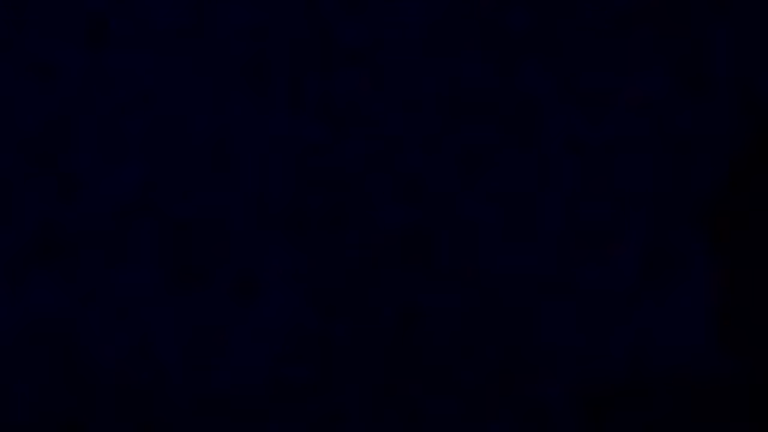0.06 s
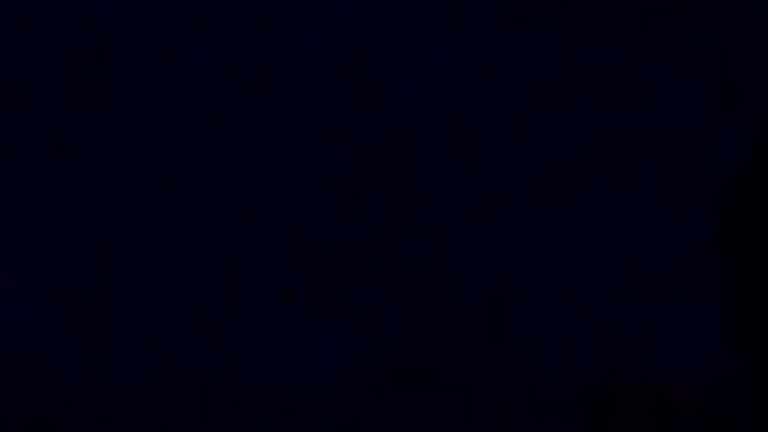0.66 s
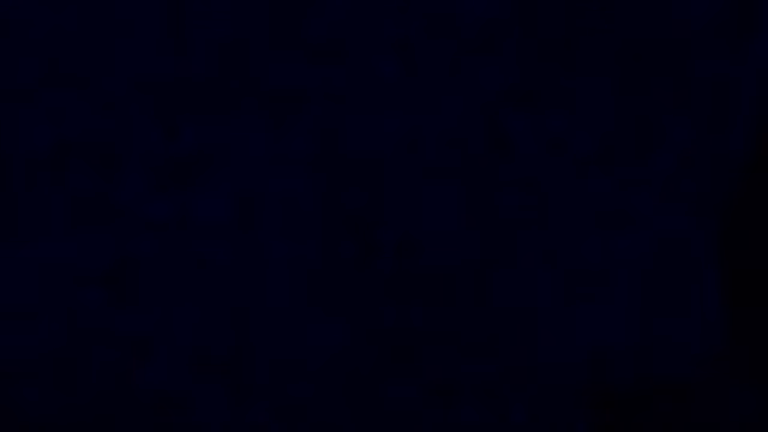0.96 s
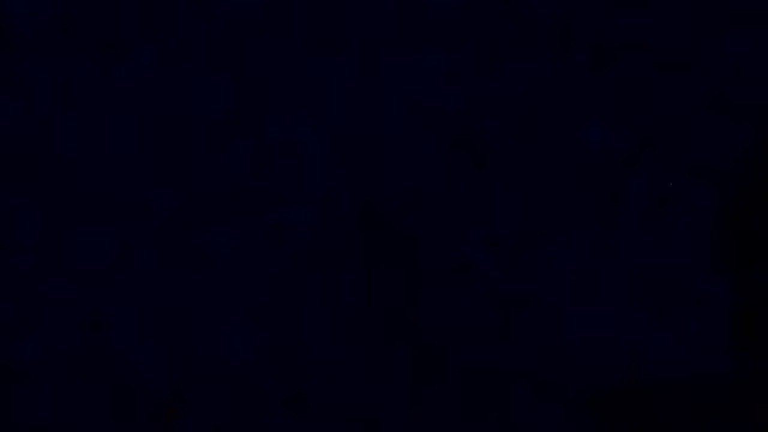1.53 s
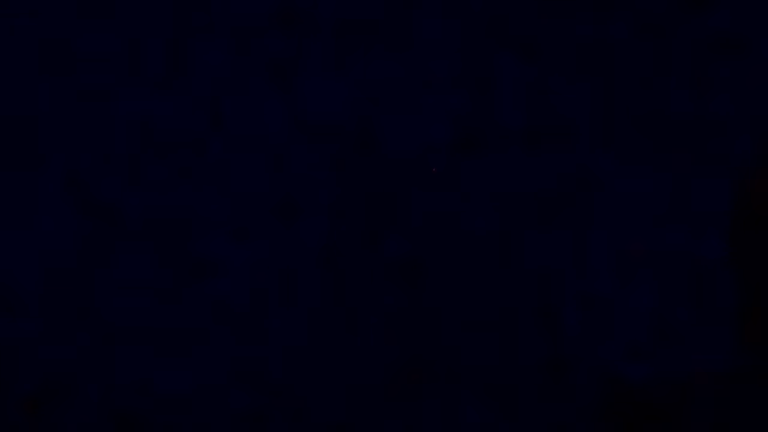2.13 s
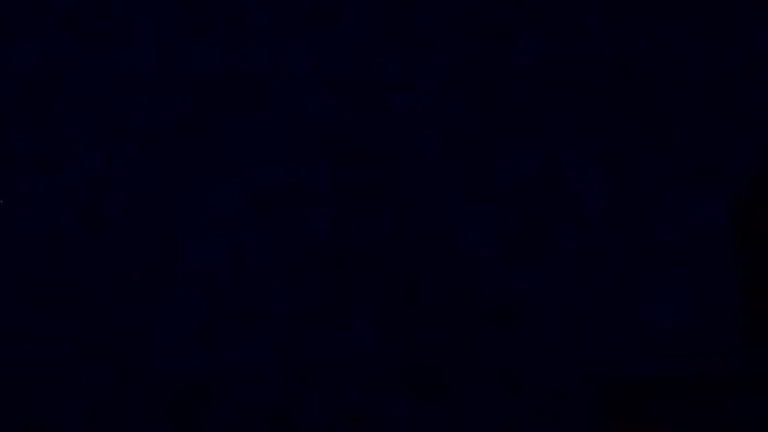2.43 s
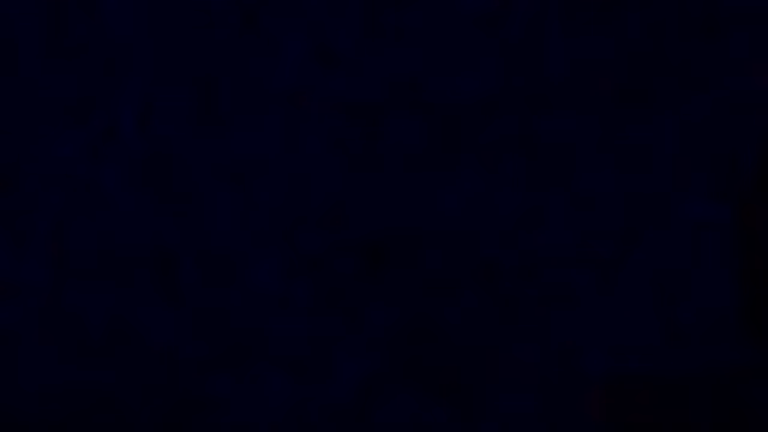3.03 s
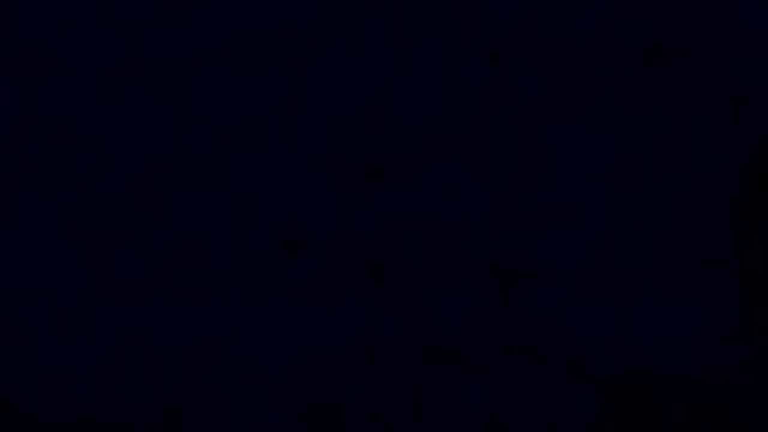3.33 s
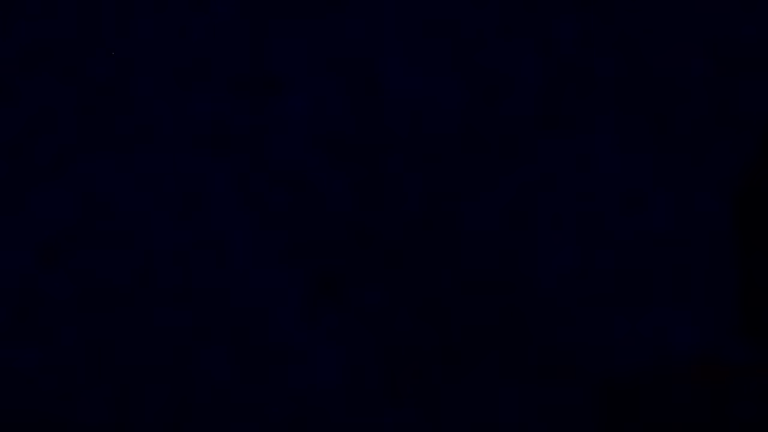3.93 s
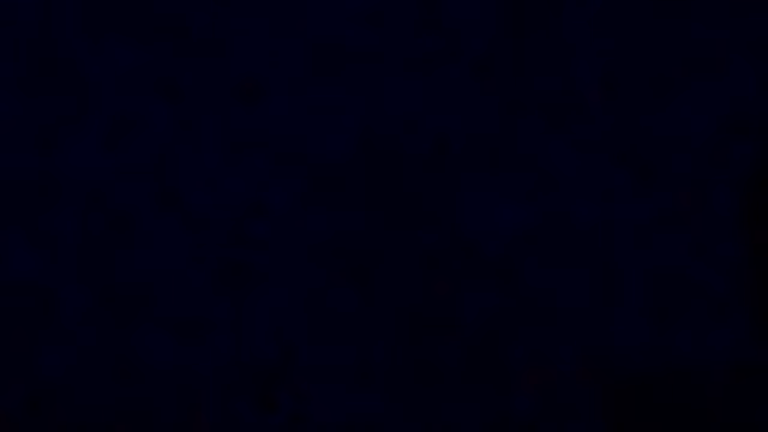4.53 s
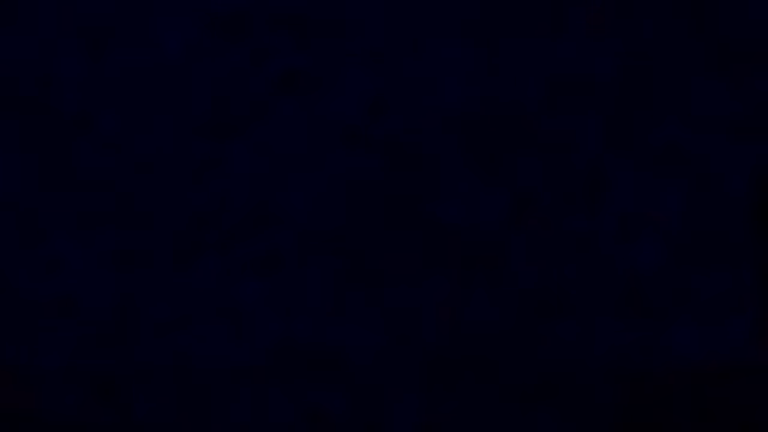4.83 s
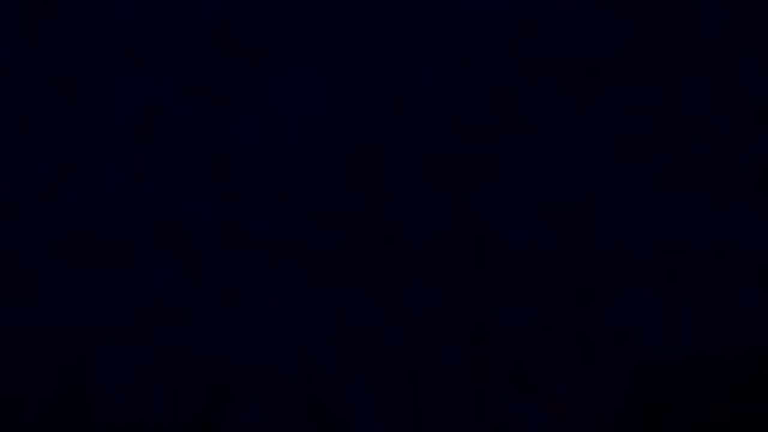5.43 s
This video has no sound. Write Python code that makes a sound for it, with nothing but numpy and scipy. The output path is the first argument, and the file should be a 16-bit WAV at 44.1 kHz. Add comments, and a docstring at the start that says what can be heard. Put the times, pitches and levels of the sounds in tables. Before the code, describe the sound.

A hand-held microphone rumbles low and unevenly for the whole stretch of nearly six seconds, outdoors among trees at night. Fingers rub it, and soft bumps land around 0.8, 2, 2.5, 3.5 and 5.3 seconds. A fairly near bird, just right of centre, calls at about 1.3, 2.5 and 4.6 seconds. Each call lasts about a third of a second: a clear whistle slides up, cracks and drops to a lower note, leaving a short echo. The second is quicker and more warbling. Far behind are a thin hiss, a steady motor hum, a very faint high cricket chirping evenly on the left, and scattered distant bird whistles. Faint falling swishes pass near the start and three times between 3.3 and 4.4 seconds. A few small dry ticks sound on the left at 4.6 seconds. From 5 seconds a slight scuff and a soft, close rustle grow to the end.

```python
"""A hand-held microphone rumbles and rubs in the night air; a cricket chirps and a distant motor hums.
Faint swishes slide down, the housing takes soft bumps, and birds whistle far off among the trees.
A nearer bird calls three times with the two voices of its syrinx: a whistle slides up, cracks, and drops
to a lower, wavering note. A few dry ticks sound under the last call; a soft rustle grows at the end."""
import sys
import numpy as np
from scipy import signal
from scipy.fft import rfft, irfft
from scipy.io import wavfile

SR = 44100
rng = np.random.default_rng(int(sys.argv[2]) if len(sys.argv) > 2 else 0)


def to_wav(s):
    """Save 16-bit WAV."""
    ch = np.atleast_2d(s).T  # columns
    pcm = np.round(np.clip(ch, -1, 1) * 32767)  # PCM
    wavfile.write(sys.argv[1], SR, pcm.astype(np.int16))


N = 250047
TIME = np.arange(N) / SR


def from_db(db):
    """Decibels to gain."""
    return 10 ** (np.asarray(db) / 20)


def unit_rms(x):
    """Scale to unit power."""
    return x / np.sqrt(np.mean(x ** 2) + 1e-20)


def in_time(points):
    """Read a curve sample by sample."""
    return np.interp(TIME, *np.transpose(points))


def at_hz(points, hz):
    """Read a spectrum on a log-frequency axis."""
    knots, values = np.transpose(points)
    return np.interp(np.log(hz + 1e-3), np.log(knots), values)


def during(start, end):
    """The samples between two moments."""
    return slice(*np.searchsorted(TIME, [start, end]))


def ramp(age, length):
    """From 0 to 1 over a given length."""
    return np.clip(age / length, 0, 1)


def bell(age, width):
    """A smooth hump of height 1."""
    return np.exp(-(age / width) ** 2)


def arch(start, length):
    """A rounded swell, silent outside its span."""
    inside, swell = during(start, start + length), np.zeros(N)
    swell[inside] = np.sqrt(np.abs(np.sin(np.pi * (TIME[inside] - start) / length)))
    return swell


def drift(rate_hz):
    """A random wander of rms 1."""
    knots = np.arange(0, TIME[-1] + 1, .5 / rate_hz)
    return unit_rms(np.interp(TIME, knots, rng.standard_normal(len(knots))))


def band(x, low_hz, high_hz):
    """Gentle band-pass."""
    return signal.sosfilt(signal.butter(2, [low_hz, high_hz], "band", fs=SR, output="sos"), x + 1e-18)


def phase_of(hz):
    """Running phase of a moving pitch."""
    return 2 * np.pi * np.cumsum(hz) / SR


def glides(rows):
    """Tones that swell and fade as they slide from one pitch to another."""
    tones = np.zeros(N)
    for start, length, from_hz, to_hz, db in rows:
        hz = np.interp(TIME, [start, start + length], [from_hz, to_hz])
        tones += from_db(db) * arch(start, length) * np.sin(phase_of(hz))
    return tones


def place(x, left_db, lag_ms=0.):
    """Place a source: the left side is left_db louder than the right and lag_ms later."""
    left = np.interp(TIME - lag_ms / 1000, TIME, x)
    return np.array([left, x]) * from_db([[left_db / 2], [-left_db / 2]])


def trees(x, t60, gap_s):
    """Scatter from trunks and leaves: dense echoes that build up and die away."""
    age = TIME[:SR]
    echoes = rng.standard_normal(SR) + 0.31 * rng.standard_normal((2, SR))
    echoes = echoes * from_db(-60 * age / t60) * (1 - bell(age, gap_s))
    return signal.fftconvolve(x[None], unit_rms(echoes) / np.sqrt(SR), axes=1)[:, :N]


# How alike the microphone's two ports hear: (frequency [Hz], likeness [ratio, capped at 1])
PORT_LIKENESS = [(25, 0.67), (55, 1.1), (110, 1.3), (200, 0.96), (400, 0.84), (1000, 0.53), (3000, 0.4),
                 (6000, 0.58), (12000, 0.2)]
# Lean between the ports: (frequency [Hz], left minus right [dB])
PORT_BALANCE = [(30, -3.5), (100, 0.5), (350, -1), (1200, 2.5), (2800, 4.5), (5000, -0.1), (12000, 6.5)]
def stereo_noise(spectrum):
    """Coloured noise of rms 1, alike at both ports in the bass and less so in the treble."""
    hz = np.arange(N // 2 + 1) * SR / N
    mid, side = rfft(rng.standard_normal((2, N))) * from_db(at_hz(spectrum, hz))
    alike = np.clip(at_hz(PORT_LIKENESS, hz), 0, 1)
    signs = np.array([[1], [-1]])
    ports = np.sqrt(1 + alike) * mid + signs * np.sqrt(1 - alike) * side
    return unit_rms(irfft(ports * from_db(signs * at_hz(PORT_BALANCE, hz) / 2), N))


# Rumble of the hand that holds the microphone: (time [s], level [dB])
HAND_SHAKE = [(0, -39.5), (.2, -41.5), (.29, -33.5), (.42, -37), (.55, -34.5), (.66, -36.5), (.75, -41),
              (.93, -39), (1.3, -40), (1.5, -46), (1.8, -37), (2.0, -43), (2.5, -39), (2.8, -43),
              (3.6, -39.5), (4.4, -38.5), (5.3, -43), (5.67, -38)]
# Fingers on the housing: (start [s], length [s], level [dB], speed [ratio])
FINGER_RUBS = [(0.016, 0.24, -37, 0.94), (0.448, 0.21, -37, 0.89), (0.727, 0.36, -40.5, 1.056),
               (1.12, 0.21, -45.5, 0.97), (1.842, 0.14, -38.5, 1.003), (1.99, .19, -39.5, 1.03),
               (2.247, 0.14, -45, 1.01), (2.461, 0.082, -33, 0.95), (2.707, .1, -42, 1.02),
               (3.109, 0.067, -40.5, 0.9), (3.419, 0.25, -43.5, .95), (3.61, 0.2, -37.5, .88),
               (4.225, 0.19, -47.5, 0.91), (5.324, 0.22, -41, 1.02), (5.604, 0.068, -34, 0.863)]
# Colours of the rumble and the rubbing: (frequency [Hz], relative density [dB])
RUMBLE_COLOUR = [(8.8, -20), (15, 6), (27, -3), (43, -2.5), (130, -10), (170, -48), (290, -120)]
RUB_COLOUR = [(30, -34), (60, -13), (100, 0.5), (140, 3), (190, -1.5), (250, -14), (350, -25.5), (600, -45),
              (2000, -101)]
def handling(resting_grip_db=-48.5, lumpy_db=1.17):
    """The grip shakes the housing and the fingers rub it; a faster rub sounds higher."""
    rubs, speed = np.zeros(N), np.ones(N)
    for start, length, db, rub_speed in FINGER_RUBS:
        rubs += from_db(db) * arch(start, length)
        speed[during(start, start + length)] += rub_speed - 1
    travel = np.cumsum(speed) / SR % TIME[-1]
    friction = np.array([np.interp(travel, TIME, port) for port in stereo_noise(RUB_COLOUR)])
    rub_gain = np.hypot(from_db(resting_grip_db), rubs) * from_db(lumpy_db * drift(18))
    rumble = from_db(in_time(HAND_SHAKE)) * stereo_noise(RUMBLE_COLOUR)
    return rumble + rub_gain * friction


# Haze of the farthest birds, and a rustle close by: (time [s], level [dB])
CHORUS_LEVEL = [(0, -66), (.55, -80), (.85, -70.5), (1.6, -64.5), (2.1, -70), (2.9, -68), (4.2, -69),
                (5.67, -71)]
RUSTLE_LEVEL = [(0, -84), (3.3, -70.5), (4.5, -63.5), (4.95, -66), (5.12, -61), (5.32, -57), (5.47, -58.5),
                (5.67, -52.5)]
# Colours of the far hiss, the haze and the rustle: (frequency [Hz], relative density [dB])
AIR_COLOUR = [(120, -21), (250, -5.5), (330, -9), (500, -15), (850, -22.5), (1100, -17), (1700, -23),
              (2500, -27), (3300, -34), (4100, -37), (5800, -34), (7200, -31), (8200, -45.5),
              (10200, -46.5), (11000, -52), (12200, -47), (13500, -62)]
HAZE_COLOUR = [(1200, -39), (1800, -2), (2400, -1), (2900, -3), (3400, -5.5), (4200, -28.5), (8000, -60)]
RUSTLE_COLOUR = [(200, 11.5), (450, -4.5), (1000, 0.5), (1700, 1.5), (3000, -4.5), (4500, -4.5),
                 (7000, -12.5), (9000, -24.5), (12000, -20.5), (14000, -24)]
def night_air(hiss_db=-56.5):
    """Steady far hiss, the haze of the farthest birds, and a soft grainy rustle that grows close by."""
    hiss = from_db(hiss_db + 0.66 * drift(6)) * stereo_noise(AIR_COLOUR)
    haze = from_db(in_time(CHORUS_LEVEL) + 2.0 * drift(11)) * stereo_noise(HAZE_COLOUR)
    rustle = from_db(in_time(RUSTLE_LEVEL) + 1.44 * drift(60)) * stereo_noise(RUSTLE_COLOUR)
    return hiss + haze + rustle


# A motor in the distance, centred: (order [multiple of the turning rate], base level [dB])
MOTOR_ORDERS = [(17, -70), (18, -79), (19, -79), (20, -79.5), (21, -80.5), (22, -77.5), (23, -84),
                (24, -82)]
# How well it carries to the microphone: (time [s], gain [dB])
MOTOR_CARRY = [(0, 1), (1.5, 3), (2.5, -1.5), (4.7, 1.5), (5.67, -4.5)]
def motor(turn_hz=59.12, waver_db=2.0):
    """High orders of a far motor, wavering a little on the air."""
    turn = phase_of(turn_hz * (1 + 0.000954 * drift(4)))
    hum = np.zeros(N)
    for order, db in MOTOR_ORDERS:
        phase = order * turn + 0.48 * drift(6) + rng.uniform(0, 2 * np.pi)
        hum += from_db(db + waver_db * drift(4)) * np.sin(phase)
    return place(np.sqrt(2) * from_db(in_time(MOTOR_CARRY)) * hum, left_db=0)


def cricket(pitch_hz=7190, first_s=0.038, every_s=.3615, length_s=0.13, stroke_hz=22, base_db=-72.5):
    """Off to the left, chirps at a steady beat: each is a few wing strokes on one high resonance."""
    chirps = np.zeros(N)
    for beat, (late, strong) in enumerate(rng.standard_normal((16, 2))):
        start = first_s + beat * every_s + 0.01 * late
        strokes = 1 - 0.48 * np.cos(2 * np.pi * stroke_hz * (TIME - start))
        chirps += from_db(base_db + 0.5 * strong) * arch(start, length_s) * strokes
    song = chirps * np.sin(phase_of(pitch_hz + 55 * drift(200)))
    return place(song, left_db=8.5) + from_db(1.5) * trees(song, t60=0.63, gap_s=0.011)


# Faint swishes in the background: (start [s], length [s], from [Hz], to [Hz], level [dB])
FALLING_SWISHES = [(0.17, 0.3, 5510, 3570, -71), (3.337, 0.21, 5216, 2300, -69),
                   (3.75, .2, 5410, 2190, -64.5), (4.158, .19, 5300, 2200, -65.5)]
def swishes(width_hz=900):
    """A soft, broad hiss slides downwards."""
    hiss = drift(width_hz) + .5 * np.array([drift(width_hz), drift(width_hz)])
    return glides(FALLING_SWISHES) * hiss


# Knocks right on the microphone housing: (time [s], relative level [dB])
HOUSING_KNOCKS = [(0.531, -26), (0.629, -26), (0.836, -16), (1.952, -21), (2.034, -18.5), (2.49, -19),
                  (2.916, -28), (3.433, -22.5), (3.626, -23), (5.322, -19.5), (5.622, -28)]
def bumps(gain_db=1.0, ring_hz=148, t60=.035, contact_s=.0029):
    """Soft knocks set the housing ringing for a few cycles."""
    knocks, age = np.zeros(N), TIME[:SR // 8]
    for time, db in HOUSING_KNOCKS:
        knocks[round(time * SR)] = from_db(db + gain_db)
    ring = -from_db(-60 * age / t60) * np.sin(2 * np.pi * ring_hz * age)
    thud = ring * (1 - bell(age, contact_s))
    return signal.fftconvolve(knocks, thud)[:N]


# Birds far off in the wood: (start [s], length [s], from [Hz], to [Hz], level [dB])
FAR_WHISTLES = [(0.661, 0.18, 3230, 2340, -73.5), (1.005, 0.066, 2000, 3592, -81),
                (1.13, 0.03, 3120, 2950, -66), (1.821, 0.085, 1800, 2910, -66),
                (1.869, 0.037, 3870, 3600, -69), (1.928, 0.15, 3220, 2200, -70),
                (2.98, .17, 2244, 3445, -74), (3.42, 0.098, 2620, 1997, -69), (3.52, 0.14, 2490, 3510, -77),
                (3.855, 0.073, 1910, 3010, -66)]
def far_birds():
    """Distant whistles reach the microphone only as scatter."""
    return trees(np.sqrt(2) * glides(FAR_WHISTLES), t60=0.22, gap_s=0.0022)


CRACK_S, PUSH_S = .011, 0.013   # the upward flick; half-width of each voice's one push of air
# The bird's throat favours the middle of its range: (frequency [Hz], gain [dB])
THROAT_GAIN = [(1600, -16), (1900, -7.5), (2150, -7), (2450, -2.5), (2700, 0.5), (3200, -6.5), (3900, -3)]
# The nearer bird's calls, levels before throat and accents: (crack time [s], rise [s], fall [s],
# high voice [Hz], crack top [Hz], squeak [Hz], low voice [Hz], droop [Hz], warble depth [Hz],
# rise level [dB], squeak level [dB], fall level [dB], push place [share of the rise], push [dB])
NEAR_CALLS = [(1.444, 0.19, .174, 2519, 3260, 3172, 1910, 150, 30.1, -51.5, -60, -50, 0.92, 7.5),
              (2.574, .092, .2, 2784, 3890, 3353, 2115, 359, 750, -50, -45.5, -45.5, 0.72, 5),
              (4.705, .167, .174, 2550, 3253, 3144, 1939, 220.2, 65, -49, -64, -47, .78, 2)]
def high_voice(start_flat=.38, settle_share=.38, swell_db=3, crack_db=6.5, release_s=.004):
    """Pitch and gain of a whistle that slides up, swells, flicks at the crack and leaves a squeak."""
    pitch, gain = np.zeros((2, N))
    unsteady = 1 + 0.0121 * drift(200)
    for call in NEAR_CALLS:
        crack, rise_s, _, high_hz, top_hz, squeak_hz = call[:6]
        rise_db, squeak_db, _, push_place, push_db = call[9:]
        squeak_start = crack + .02
        rise, squeak = during(crack - rise_s, squeak_start), during(squeak_start, crack + rise_s)
        age = TIME[rise] - crack   # negative before the crack
        along = ramp(age + rise_s, rise_s)
        slide_hz = high_hz * (1 - start_flat * np.exp(-along / settle_share))
        pitch[rise] = slide_hz + (top_hz - slide_hz) * ramp(age, CRACK_S) ** 2
        level_db = rise_db + at_hz(THROAT_GAIN, pitch[rise]) + swell_db * (along - 1)
        level_db += crack_db * bell(age - CRACK_S / 2, CRACK_S)
        level_db += push_db * bell(age + rise_s * (1 - push_place), PUSH_S)
        attack, release = ramp(along, 0.23), ramp(CRACK_S + release_s / 2 - age, release_s)
        gain[rise] = from_db(level_db) * attack * release
        pitch[squeak] = squeak_hz * unsteady[squeak]
        gain += from_db(squeak_db) * arch(squeak_start, 0.19 * rise_s)
    return pitch, gain


def low_voice(crest_share=.4, push_share=0.59, warble_hz=29.06, attack_s=.016, release_s=0.019):
    """Pitch and gain of the lower note after the crack: it arches over and droops, warbling at first."""
    pitch, gain = np.zeros((2, N))
    for crack, _, fall_s, _, _, _, low_hz, droop_hz, depth_hz, _, _, fall_db, _, push_db in NEAR_CALLS:
        start = crack + CRACK_S
        fall = during(start, start + fall_s)
        age = TIME[fall] - start
        along = age / fall_s
        flicks = np.abs(np.cos(np.pi * warble_hz * age)) ** 7   # pointed, upward
        warble = flicks * (1 - ramp(along, .75) ** 3)   # gone three quarters of the way through
        droop = ((along - crest_share) / (1 - crest_share)) ** 2
        pitch[fall] = low_hz - droop_hz * droop + depth_hz * warble
        push = bell(age - push_share * fall_s, PUSH_S)
        level_db = fall_db + at_hz(THROAT_GAIN, pitch[fall]) + push_db * push
        gain[fall] = from_db(level_db) * ramp(age, attack_s) * ramp(fall_s - age, release_s)
    return pitch, gain


def syrinx_side(hz, loudness, jitter, flutter_db, octave_db, octave_top_hz):
    """One side of the syrinx: gain, phase and octave of a slightly unsteady whistle."""
    gain = np.sqrt(2) * loudness * from_db(flutter_db * drift(45))
    phase = phase_of(hz * (1 + jitter * drift(150)))
    # the octave swells half as much as the fundamental, and the throat shuts it off above a limit
    octave_gain = from_db(octave_db + 2.0 * drift(70)) * np.sqrt(gain)
    throat = 1 / (1 + (2 * hz / octave_top_hz) ** 20)
    return gain, phase, octave_gain * throat * np.sin(2 * phase)


# Early echoes off the ground and near trunks: (delay [s], level [dB], left minus right [dB])
EARLY_ECHOES = [(.0055, -14.5, 1), (.013, -19.5, 3), (.023, -12, -3)]
def near_bird(sum_tone_db=-17, twigs_db=-7, wood_db=-13):
    """Just right of centre, two whistling voices with weak octaves; any overlap makes a sum tone."""
    high, high_phase, high_octave = syrinx_side(
        *high_voice(), jitter=0.006, flutter_db=2.5, octave_db=-42.5, octave_top_hz=5497)
    low, low_phase, low_octave = syrinx_side(
        *low_voice(), jitter=0.0086, flutter_db=1.4, octave_db=-38.5, octave_top_hz=4600)
    whistle = high * np.sin(high_phase) + low * np.sin(low_phase)
    sum_tone = from_db(sum_tone_db) * np.sqrt(high * low) * np.sin(high_phase + low_phase)
    call = whistle + high_octave + low_octave + sum_tone
    early = sum(place(from_db(db) * np.interp(TIME - delay, TIME, call), left_db)
                for delay, db, left_db in EARLY_ECHOES)
    # nearby twigs scatter the upper notes most; the wood behind adds a longer tail
    twigs = from_db(twigs_db) * trees(band(whistle, 2150, 3400), t60=0.5, gap_s=0.015)
    wood = from_db(wood_db) * trees(call, t60=0.83, gap_s=0.047)
    return place(call, left_db=-2.0, lag_ms=0.038) + early + twigs + wood


# Dry ticks left of the microphone: (time [s], strike level [dB], bright snap [multiple of the strike])
DRY_TICKS = [(4.579, -43.5, 6.5), (4.590, -48, 3.0), (4.595, -44.5, .4), (4.6345, -38, .3),
             (4.659, -43, .5), (4.66, -48, .1)]
# What they ring with: (frequency [Hz], relative level [dB], t60 [s])
WOODY_MODES = [(1290, -10, 0.014), (1890, -1, 0.0094), (2188, -4, 0.013), (3415, -12, 0.0099),
               (5080, -18, .014)]
def ticks():
    """Small dry cracks: each sharp snap sets a few woody modes ringing."""
    strikes, snaps = np.zeros((2, N))
    for time, db, snap in DRY_TICKS:
        strikes[round(time * SR)] = from_db(db)
        snaps[round(time * SR)] = snap * from_db(db)
    age = TIME[:SR // 10]
    ring = sum(from_db(db - 60 * age / t60) * np.sin(2 * np.pi * hz * age) for hz, db, t60 in WOODY_MODES)
    cracks = band(signal.fftconvolve(strikes, ring)[:N], 1030, 5700) + band(snaps, 4000, 8300)
    return place(cracks, left_db=6.0) + from_db(-5.5) * trees(cracks, t60=0.072, gap_s=0.0012)


def scuff(start_s=5.08, length_s=0.076, level_db=-61):
    """A brief soft scrape on the left, just ahead of the rustle's last swell."""
    scrape = unit_rms(band(rng.standard_normal(N), 740, 1595))
    return place(from_db(level_db) * arch(start_s, length_s) * scrape, left_db=10.0)


def scene():
    """The night wood at the two ports of the hand-held microphone."""
    background = night_air() + motor() + cricket() + swishes()
    return handling() + background + bumps() + far_birds() + near_bird() + ticks() + scuff()


def record(dry):
    """The recorder cuts the top steeply."""
    cutoff_hz = 12800
    return signal.sosfilt(signal.ellip(10, .1, 70, cutoff_hz, fs=SR, output="sos"), dry)


dry = scene()
out = record(dry)
to_wav(out)
```